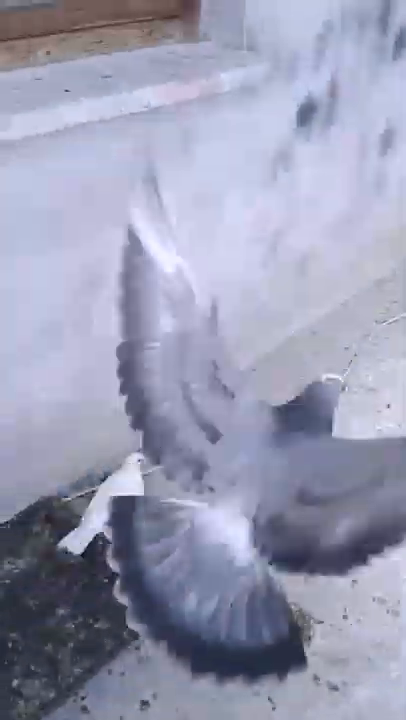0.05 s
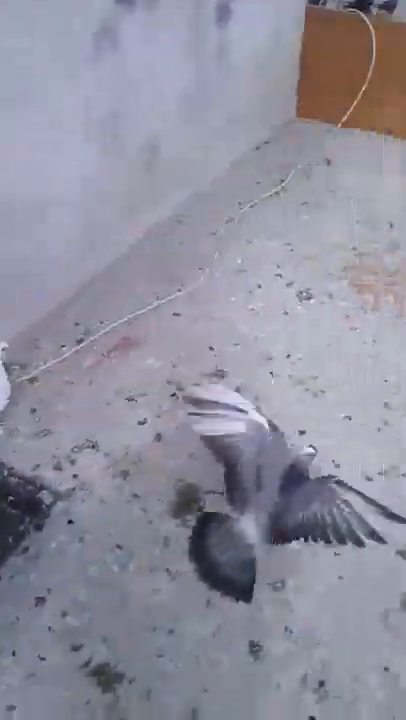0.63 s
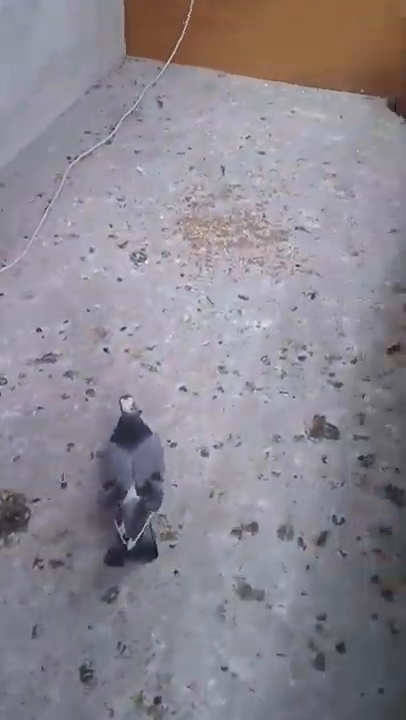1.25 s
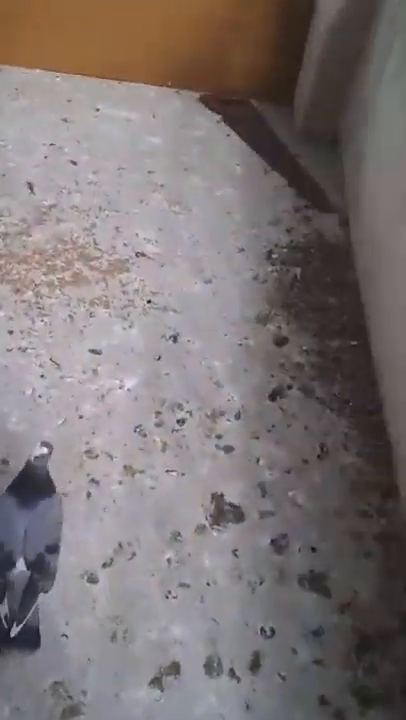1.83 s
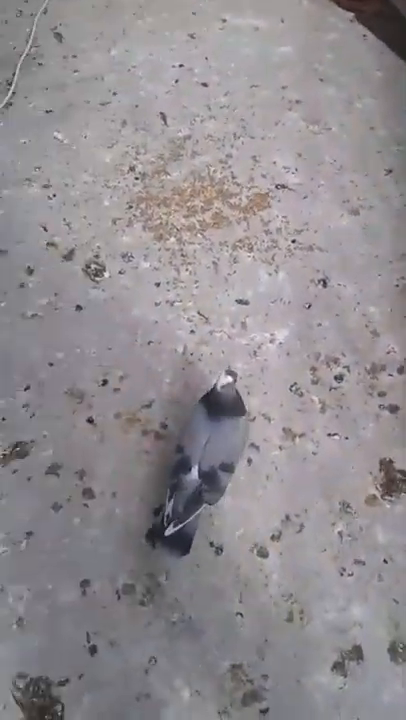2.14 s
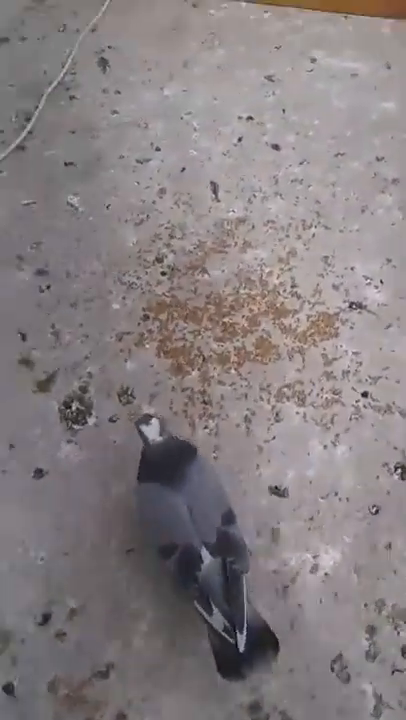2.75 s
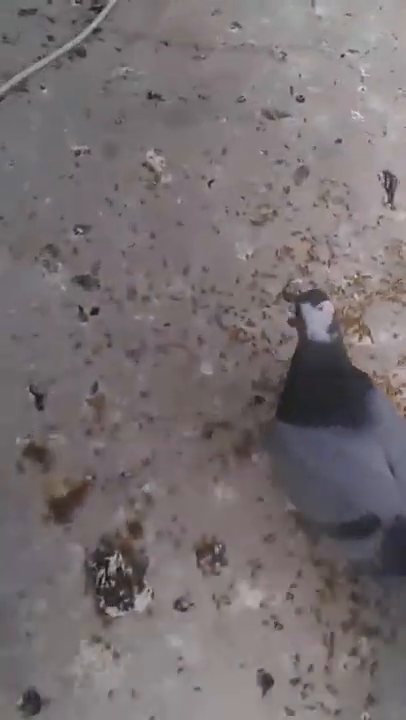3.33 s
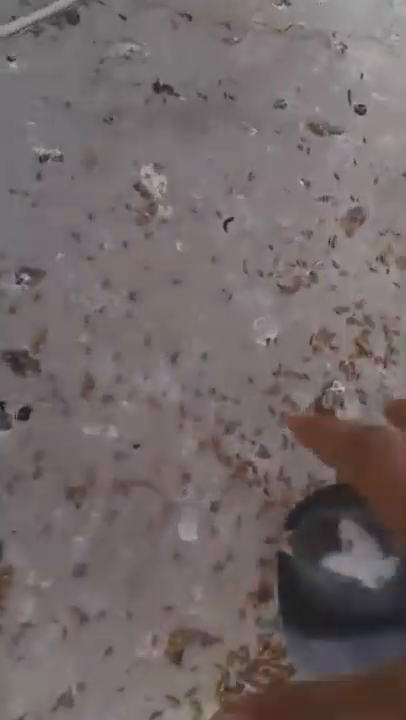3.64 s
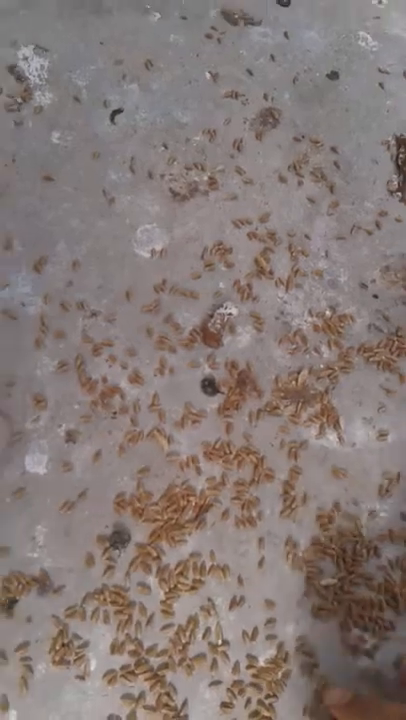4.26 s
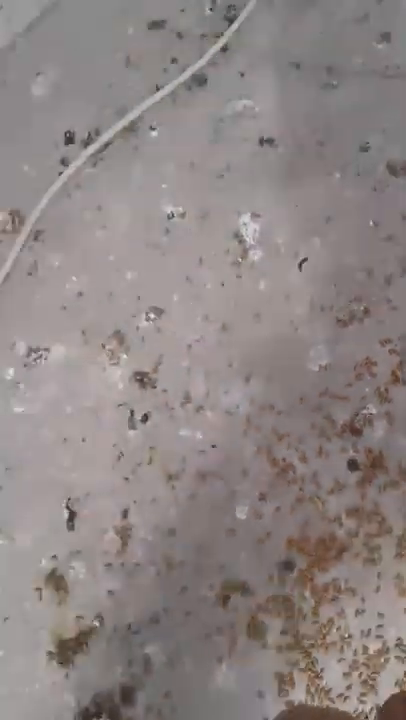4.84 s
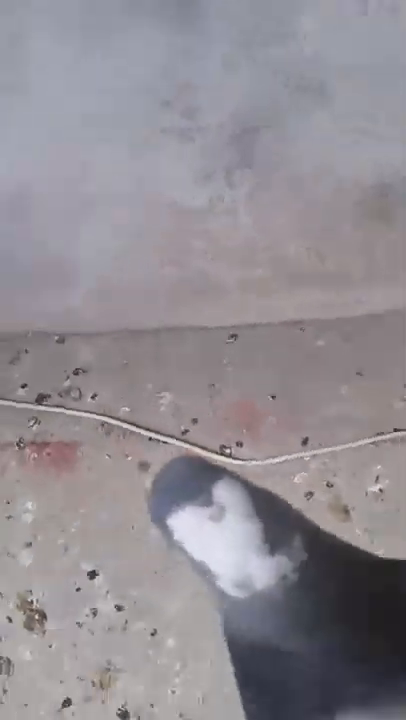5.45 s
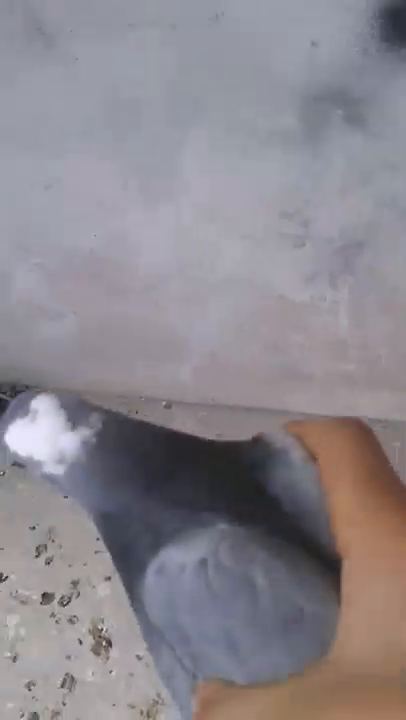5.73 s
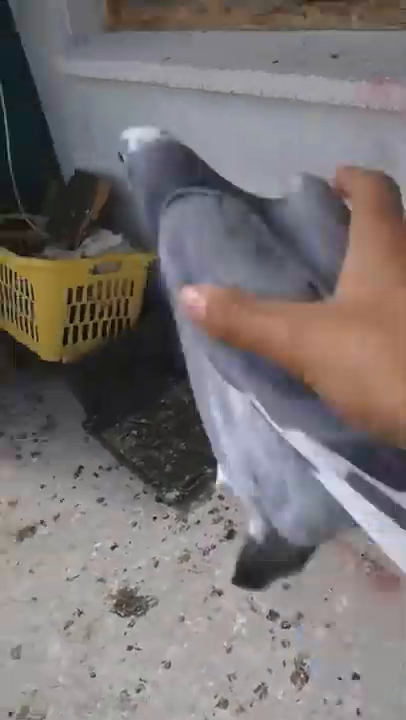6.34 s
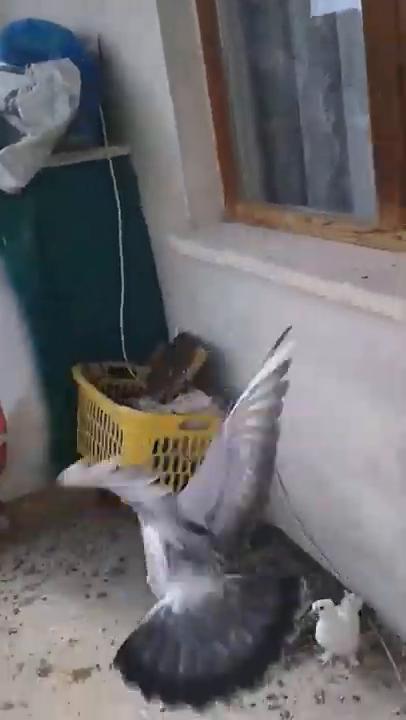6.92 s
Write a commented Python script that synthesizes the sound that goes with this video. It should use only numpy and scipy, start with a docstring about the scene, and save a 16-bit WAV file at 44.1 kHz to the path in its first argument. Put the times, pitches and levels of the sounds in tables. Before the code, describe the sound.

Close pigeon wing beats and rustling feathers on a concrete balcony, interrupted by a loud knock and finger rubbing on the microphone.

```python
"""Sharp wing claps and a rustle of feathers: a pigeon lands on a narrow concrete balcony, claws ticking.
A hand rubs and knocks on the phone, then grabs the bird, which beats its wings hard, struggles over
scattered seed and flies off with whistling feathers. Claps are slaps of air and quills, and bare walls
ring briefly after each; swishes and rubs are streams of tiny slips, bumps single swings of pressure.
Small birds chirp far away over an outdoor hush."""
import sys
import numpy as np
from scipy import signal
from scipy.fft import rfft, irfft, next_fast_len
from scipy.io import wavfile

SR = 44100
rng = np.random.default_rng(int(sys.argv[2]) if len(sys.argv) > 2 else 0)


def unload_audio(sound):
    """Save the sound as a 16-bit wav file, at the path given as the first command line argument."""
    columns = np.transpose(np.atleast_2d(sound))
    # keep every value between -1 and 1, then stretch to whole-number steps
    steps = np.round(np.clip(columns, -1, 1) * 32767)
    wavfile.write(sys.argv[1], SR, steps.astype(np.int16))


N = 312447
TIME = np.arange(N) / SR

# wing beats, about eight a second in the struggle:
# (time [s], level [dB], vane ring [Hz], slap t60 [s], body [dB])
WING_BEATS = [(0.0048, -21, 4420, 0.03, 2.5), (0.147, -29, 4960, 0.047, 2.5), (0.3213, -18, 1470, .022, 0),
              (0.324, -17, 4540, 0.031, -12.5), (2.8878, -17, 3060, 0.053, -10.5),
              (3.012, -27, 5670, 0.037, -4), (3.14, -20, 5360, 0.039, -1.5),
              (3.2669, -28.5, 5370, 0.071, -3.5), (3.397, -26, 5300, 0.079, -4.5),
              (3.521, -31.5, 2870, .17, -7), (3.767, -29.5, 5630, 0.027, -2), (3.892, -30, 5760, .09, -8),
              (4.013, -29, 5370, 0.073, -2.5), (4.15, -34.5, 4750, 0.097, -8), (4.283, -50, 2280, .06, 4),
              (4.406, -43, 3950, 0.2, -3), (4.52, -39.5, 2040, 0.1, 4.5), (4.877, -39.5, 2170, 0.057, -5),
              (5.001, -36.5, 2250, 0.11, 12.5), (5.143, -24.5, 2340, 0.076, 14),
              (5.837, -37, 3950, 0.15, -26), (6.9018, -27, 5500, 0.066, 1.5), (7.065, -34, 5770, 0.028, -1)]
# EQ of claps, ticks and seed clicks: (frequency [Hz], gain [dB])
IMPACT_EQ = [(60, -25.5), (250, -1), (700, 0), (2200, 1), (5500, -4), (8000, -12.5), (12000, -16.5),
             (17000, -24)]
# EQ of moving feathers: (frequency [Hz], gain [dB])
FEATHER_EQ = [(60, -33.5), (300, -1), (900, -2.5), (2100, 2), (3500, -5.5), (6000, -2.5), (8000, -15.5),
              (16000, -19)]


def undb(db):
    """Decibels to gain."""
    return 10 ** (np.asarray(db) / 20)


def unit(x):
    """Scale to rms 1."""
    return x / np.sqrt(np.mean(x ** 2) + 1e-20)


def with_energy(x, span_s):
    """Scale a hit to the energy of span_s seconds at rms 1."""
    return x * np.sqrt(span_s * SR / np.sum(x ** 2))


def add(track, s, x):
    """Mix x into the track from time s on."""
    start = int(round(s * SR))
    lo, hi = max(start, 0), min(start + len(x), N)
    if hi > lo:
        track[lo:hi] += x[lo - start:hi - start]


def eq(x, points, body_db=0, edge_db=0):
    """Causal filter through (Hz, dB) points, with shelves for the low body and the high edge."""
    size = next_fast_len(len(x) + 1024, True)
    size += size % 2
    log_f = np.log(np.maximum(np.arange(size // 2 + 1) * SR / size, 1))
    hz, db = np.transpose(points)
    curve_db = np.interp(log_f, np.log(hz), db)
    shelves_db = np.interp(log_f, np.log([600, 1700, 2900, 7000]), [body_db, 0, 0, edge_db])
    cepstrum = irfft(np.log(undb(curve_db + shelves_db)))
    cepstrum[1:size // 2] *= 2  # minimum phase: nothing rings ahead of an attack
    cepstrum[size // 2 + 1:] = 0
    return irfft(rfft(x, size) * np.exp(rfft(cepstrum)))[:len(x)]


def resonance(x, hz, width_hz):
    """Two-pole band-pass, gain 1 at the centre."""
    return signal.lfilter(*signal.iirpeak(hz, hz / width_hz, fs=SR), x)


def wander(rate, size):
    """Random drift that takes a new course `rate` times a second."""
    knots = rng.standard_normal(int(size * rate / SR) + 2)
    return 1.9 * np.interp(np.arange(size) * rate / SR, np.arange(len(knots)), knots)


def grit(size, rate, spread_db):
    """Dense tiny slips of uneven strength."""
    return unit(rng.standard_normal(size) * undb(spread_db * wander(rate, size)))


def strokes(rows, points, slip_rate, spread_db, fall_shape, ring, ring_width_hz):
    """Sliding contacts: a stream of slips swells to a crest and dies away, ringing what is rubbed."""
    out = np.zeros(N)
    for s, rise, fall, db, body_db, edge_db, ring_hz in rows:
        t = np.arange(-3 * rise, 4 * fall, 1 / SR)
        speed = np.exp(-np.where(t < 0, (t / rise) ** 2, np.abs(t / fall) ** fall_shape))
        slips = grit(len(t), slip_rate, spread_db)
        slips = slips + ring * resonance(slips, ring_hz, ring_width_hz)
        add(out, s + t[0], undb(db) * speed * unit(eq(slips, points, body_db, edge_db)))
    return out


def glides(rows, partials_db, waver, waver_rate, arch):
    """Short wavering tones that swell and fade while their pitch slides and arches."""
    out = np.zeros(N)
    for s, length, start_hz, end_hz, db in rows:
        size = int(length * SR)
        swell = np.hanning(size)
        bend = 1 + arch * (swell - .5) + waver * wander(waver_rate, size)
        phase = 2 * np.pi * np.cumsum(np.linspace(start_hz, end_hz, size) * bend) / SR
        tone = sum(undb(level) * np.sin(k * phase) for k, level in enumerate(partials_db, 1))
        add(out, s, undb(db) * unit(tone) * swell)
    return out


def hush():
    """A bed of far outdoor noise with an unsteady rumble under it."""
    # EQ of the outdoor air: (frequency [Hz], gain [dB])
    air_eq = [(15, -41), (25, -13.5), (81, -7), (279, -9.5), (445, -15.5), (496, -13), (708, -17),
              (812, -17.5), (1260, -19), (1570, -20), (2370, -23), (3670, -21), (4090, -18), (4440, -24.5),
              (17500, -36)]
    # fader ride, sinking for a moment after the knock: (time [s], level [dB])
    ride = [(0, -48.5), (.95, -57), (1.9, -49.5), (2.35, -61.5), (2.9, -58), (7.08, -54.5)]
    air = unit(eq(rng.standard_normal(N), air_eq))
    rumble = unit(resonance(rng.standard_normal(N), 120, 130) * undb(3.6 * wander(25, N)))
    return (air + undb(-9.5) * rumble) * undb(np.interp(TIME, *np.transpose(ride)))


def stirring():
    """How hard the bird moves, as a gain for its rustle and crackle."""
    # movement on landing: (time [s], level before trim [dB])
    landing = [(0.0, -40), (0.6, -49.5), (0.852, -60), (1.0, -68)]
    # movement in the struggle and escape: (time [s], level before trim [dB])
    struggle = [(2.5, -67.5), (2.63, -49.5), (2.79, -50), (3.07, -40), (3.39, -48), (3.58, -44), (4.5, -47),
                (4.87, -48.5), (5.29, -57.5), (5.75, -40.5), (5.88, -57), (6.35, -52.5), (6.65, -42.5),
                (7.08, -43)]
    return sum(undb(trim_db + np.interp(TIME, *np.transpose(ride), left=-np.inf, right=-np.inf))
               for ride, trim_db in ((landing, -5.5), (struggle, -4)))


def rustle(flutter_db=2.0):
    """Barbs scrape over each other as long as the bird moves."""
    # EQ of the plumage: (frequency [Hz], gain [dB])
    plumage_eq = [(59, -41), (100, -2), (144, -15), (213, -0.5), (314, 3.5), (390, 3), (813, -2.5),
                  (1340, -6.5), (2150, -3), (2610, -8), (3310, -4.5), (5570, -4.5), (7870, -20.5),
                  (16100, -20), (17500, -37.5)]
    scrape = grit(N, 700, spread_db=0.94) * undb(flutter_db * wander(30, N))
    return unit(eq(scrape, plumage_eq)) * stirring()


def crackle(flicks_per_s=70, spread_db=8, flick_t60=0.028):
    """Single stiff feathers flick past each other; the harder the bird moves, the louder."""
    flicks = (rng.random(N) < flicks_per_s / SR) * undb(rng.uniform(-spread_db, spread_db, N))
    envelope = signal.lfilter([1], [1, -undb(-60 / (flick_t60 * SR))], flicks)
    bursts = eq(envelope * rng.standard_normal(N), FEATHER_EQ, body_db=-6, edge_db=3)
    return undb(-8) * unit(bursts) * stirring()


def wing_claps(rush_db_per_s=2000, snap=2.8, usual_t60=0.045, tail_t60=0.18, tail_build_s=0.0029):
    """Air rushes out between the wings, the tips snap together, quills slap shut, the walls answer."""
    out, contact = np.zeros(N), SR // 40
    t = TIME[:SR // 3] - TIME[contact]
    after = np.maximum(t, 0)
    tail_envelope = undb(-60 * after / tail_t60) * (1 - np.exp(-after / tail_build_s))
    for s, db, vane_hz, t60, body_db in WING_BEATS:
        envelope_db = np.where(t < 0, -32 + rush_db_per_s * t, -60 * t / t60)
        slap = grit(len(t), 1491.5, spread_db=3.0) * undb(envelope_db)
        slap[contact] += snap
        # the bird moves, so every clap has its own diffuse tail, duller than the slap
        tail = eq(rng.standard_normal(len(t)) * tail_envelope, [(1, 0)], body_db=1, edge_db=-4)
        hit = unit(slap) + undb(-5) * unit(tail)
        # a wing that strikes the hand has more body and more quill ring
        quills = 0.64 * undb(0.9 * body_db) * resonance(hit, hz=2280, width_hz=160)
        # a drawn-out slap rings more narrowly and is duller
        stretch = t60 / usual_t60
        vane = resonance(hit, vane_hz, width_hz=1700 / stretch ** 0.81)
        clap = eq(hit + vane + quills, IMPACT_EQ, body_db, edge_db=6 - 1.5 * np.log2(stretch))
        add(out, s + t[0], undb(db) * with_energy(clap, span_s=0.019))
    return out


def swishes(rise_share=.42, edge_db_per_octave=10.5, neutral_hz=2940):
    """Feathers sweep through air or over the hand: tips ring high and hiss, the flat wing is dull."""
    # feather sweeps: (crest [s], length [s], level [dB], ring [Hz])
    sweeps = [(0.025, 0.024, -41, 3600), (0.5, 0.064, -43, 3430), (1.072, 0.021, -42.5, 1820),
              (1.124, 0.039, -49.5, 2070), (2.667, .09, -50.5, 3400), (2.761, 0.13, -50.5, 3000),
              (3.101, 0.027, -37, 2500), (3.132, 0.022, -30.5, 1900), (3.439, .036, -40.5, 2520),
              (3.567, .028, -37, 2980), (3.613, 0.035, -37.5, 1900), (3.659, 0.05, -32, 2420),
              (4.228, .018, -42, 1900), (4.658, 0.035, -33.5, 6000), (4.768, 0.047, -44.5, 6300),
              (4.832, 0.037, -41.5, 6330), (4.959, .05, -39, 3300), (5.127, .018, -33, 2700),
              (5.24, 0.051, -47, 4400), (5.554, 0.046, -40, 2360), (5.639, 0.014, -36, 1600),
              (5.665, 0.051, -23, 1770), (5.736, .08, -33.5, 2010), (6.067, 0.032, -48.5, 2230),
              (6.333, 0.052, -44.5, 6050), (6.475, .04, -35, 2570), (6.53, 0.072, -37.5, 2250),
              (6.593, 0.084, -39.5, 2140), (6.709, 0.076, -42, 3120), (6.831, 0.057, -43, 2900)]
    # after each beat the open wing swings back softly, pushing air that gives it body
    backswings = [(s + .055, .02, db - 24, 2900) for s, db, *_ in WING_BEATS]
    rows = []
    for moves, body_db in ((sweeps, -2), (backswings, 8.5)):
        for s, length, db, hz in moves:
            edge_db = edge_db_per_octave * np.log2(hz / neutral_hz)
            rows.append((s, rise_share * length, (1 - rise_share) * length, db, body_db, edge_db, hz))
    return strokes(rows, FEATHER_EQ, slip_rate=980, spread_db=2.5, fall_shape=1.3,
                   ring=0.58, ring_width_hz=390)


def fumbles(spread_db=6.0, spread_octaves=0.27):
    """A shifting grip makes small random bumps: rows of (time [s], level [dB], pitch [Hz])."""
    # spells of shifting grip: (start [s], end [s], bumps [1/s], level [dB], pitch [Hz])
    spells = [(0.03, 0.117, 70, -38, 130), (0.55, 1.052, 40, -45, 180), (1.322, 1.439, 75, -42.5, 150),
              (3.33, 3.562, 65, -41, 105), (5.179, 5.332, 50, -46, 138), (6.6, 6.658, 35, -44, 85)]
    rows = []
    for start, end, rate, db, hz in spells:
        for when, strength, pitch in rng.uniform(-0.92, 1, (round((end - start) * rate), 3)):
            s = (start + end + when * (end - start)) / 2
            rows.append((s, db + spread_db * strength, hz * 2 ** (spread_octaves * pitch)))
    return rows


def thumps(cycles_in=0.44, cycles_out=0.57, sag_hz=42, sag_db=-35):
    """Each bump on the phone is a single low swing of pressure followed by a slower sag."""
    # bumps of the hand and puffs of wing air: (time [s], level [dB], pitch [Hz])
    bumps = [(0.0395, -20, 256), (0.0662, -29.5, 171), (0.1373, -32, 354), (0.4814, -32, 315),
             (0.701, -30, 208), (1.0598, -27, 239), (1.711, 8, 338), (1.7547, -5.5, 299),
             (3.4453, -31, 286), (3.5586, -24.5, 146), (4.7794, -31.5, 530), (5.0864, -22, 373),
             (5.0925, -17, 267), (5.155, -21, 366), (5.5397, -28, 340), (6.7489, -30.5, 305)]
    out, t = np.zeros(N), TIME[:4096] - TIME[2048]
    cycles = np.where(t < 0, cycles_in, cycles_out)
    for s, db, hz in bumps + fumbles():
        swing, sag = (np.sin(2 * np.pi * f * t) * np.exp(-(t * f / cycles) ** 2) for f in (hz, sag_hz))
        add(out, s + t[0], undb(db) * (swing + undb(sag_db) * sag * (t > 0)))
    return out


def far_birds():
    """Small distant birds chirp in thin, wavering tones."""
    # chirps: (time [s], length [s], start pitch [Hz], end pitch [Hz], level [dB])
    chirps = [(.60, 0.096, 3580, 3630, -52.5), (.87, 0.044, 3630, 3920, -53), (1.13, 0.11, 5300, 5000, -57),
              (2.64, .06, 5580, 5220, -49), (2.665, 0.019, 3410, 3300, -42), (2.72, 0.13, 5400, 5270, -57),
              (4.66, 0.093, 5400, 5110, -48.5), (4.78, 0.1, 5180, 5320, -47)]
    return glides(chirps, partials_db=[0], waver=.02, waver_rate=900, arch=.02)


def ticks(t60=0.0051, crunch=0.52):
    """Tiny hard contacts that hardly ring: a spike and a short crunch."""
    # taps of claws, seeds and fingernails: (time [s], level [dB], edge [dB])
    taps = [(0.7636, -49, 4), (0.8141, -45, -3), (1.2418, -33.5, 5), (1.3552, -30.5, 18),
            (1.6139, -28, 16.5), (1.711, -9.5, -2), (3.3685, -40, 2), (3.4484, -33.5, -12),
            (3.6178, -35, 5), (3.638, -29, 1), (3.674, -28.5, -4), (3.7187, -34.5, -2), (5.379, -44.5, -1),
            (5.75, -34.5, 5), (6.475, -36.5, 9)]
    out, t = np.zeros(N), TIME[:1024]
    for s, db, edge_db in taps:
        tick = crunch * rng.standard_normal(len(t)) * undb(-60 * t / t60)
        tick[0] += 1
        tick = eq(tick, IMPACT_EQ, body_db=-10, edge_db=edge_db)
        add(out, s, undb(db) * with_energy(tick, span_s=0.0025))
    return out


def finger_rubs(firm_touch_db=-22):
    """Skin drags over the phone's case: dull when pressed hard, hissing when it only skids."""
    # finger slides: (crest [s], rise [s], fall [s], level [dB], body [dB], case ring [Hz])
    slides = [(1.32, 0.042, .055, -42, -5.5, 1700), (1.605, .013, 0.03, -47, -17.5, 500),
              (1.722, 0.0066, 0.0091, -18, 7, 400), (1.752, .0065, 0.0088, -9.5, 2.5, 420),
              (1.765, .005, 0.03, -15.5, 0.5, 598), (1.817, .006, 0.024, -18.5, 2, 480),
              (1.85, .016, 0.015, -27, 2.5, 500), (1.906, .011, 0.014, -17.5, 2, 1700),
              (1.924, .008, .012, -10, -2.5, 1500), (2.014, .015, 0.039, -28, -9, 600),
              (2.122, 0.05, 0.037, -41.5, -12, 1200)]
    # EQ of the case: (frequency [Hz], gain [dB])
    case_eq = [(40, -25.5), (90, -9.5), (160, 0.5), (400, 1.5), (1800, -5.5), (3500, -10), (6000, -23.5),
               (10000, -31), (17000, -35)]
    rows = []
    for s, rise, fall, db, body_db, ring_hz in slides:
        skid_edge_db = max(firm_touch_db - db, 0) - 0.5
        rows.append((s, rise, fall, db, body_db, skid_edge_db, ring_hz))
    return strokes(rows, case_eq, slip_rate=1200, spread_db=1.5, fall_shape=1.46,
                   ring=.4, ring_width_hz=400)


def seeds(start_s=3.0, busiest_s=3.65, end_s=4.7, peak_clicks_per_s=100, db=-47, spread_db=1.5):
    """Feet and hand nudge loose grains on the concrete; each click rings briefly at its own pitch."""
    out, spike = np.zeros(N), signal.unit_impulse(1024)
    rate = np.interp(TIME, [start_s, busiest_s, end_s], [0, peak_clicks_per_s, 0])
    starts = TIME[rng.random(N) < rate / SR]
    for s, (strength, pitch) in zip(starts, rng.standard_normal((len(starts), 2))):
        ring_hz = np.clip(3000 * np.exp(.5 * pitch), 1000, 9000)
        click = eq(spike + 4 * resonance(spike, ring_hz, width_hz=280), IMPACT_EQ, body_db=-4)
        attack_rms = np.sqrt(np.mean(click[:SR // 400] ** 2))
        add(out, s, undb(db + spread_db * min(strength, 2)) * click / attack_rms)
    return out


def thin_hiss(hz=2450, width_hz=500, waver_db=.8):
    """A faint, narrow, wavering band of noise comes and goes."""
    # swells of hiss: (time [s], length [s], level [dB])
    swells = [(4.604, 0.22, -53.5), (5.88, 0.52, -58.5), (6.45, 0.27, -51)]
    envelope = np.zeros(N)
    for s, length, db in swells:
        add(envelope, s, undb(db) * np.sqrt(np.hanning(int(length * SR))))
    band = resonance(resonance(rng.standard_normal(N), hz, width_hz), hz, width_hz)
    return unit(band) * undb(waver_db * wander(18, N)) * envelope


def wing_whistle():
    """Flight feathers whistle in the air as the pigeon takes off."""
    # whistling strokes: (time [s], length [s], start pitch [Hz], end pitch [Hz], level [dB])
    whistles = [(6.795, 0.057, 750, 696, -41.5), (6.94, 0.078, 621, 658, -38.5)]
    # harmonics of the whistle, from the fundamental up: (level [dB])
    partials_db = [0, -2, -2, -15, -13]
    return glides(whistles, partials_db, waver=.022, waver_rate=300, arch=.06)


def balcony(x, wet_db=-8, t60_low=0.46, t60_mid=0.23, t60_high=0.07, build_s=0.0014):
    """Close bare walls add a short dense tail whose treble dies first."""
    t = TIME[:SR // 2]
    noise = rng.standard_normal(len(t))
    low, low_and_mid = (signal.sosfilt(signal.butter(2, hz, fs=SR, output="sos"), noise)
                        for hz in (900, 7000))
    bands = (undb(-2) * low, t60_low), (low_and_mid - low, t60_mid), (noise - low_and_mid, t60_high)
    tail = sum(band * undb(-60 * t / t60) for band, t60 in bands) * (1 - np.exp(-t / build_s))
    tail /= np.sqrt(np.sum(tail ** 2))
    return x + undb(wet_db) * signal.fftconvolve(x, tail)[:N]


def scene():
    """Swishes, seeds, whistle and chirps ring in the balcony; claps bring their tails; the rest is dry."""
    whistle = undb(-0.5) * wing_whistle()
    birds = far_birds()
    reverberant = balcony(swishes() + seeds() + whistle + birds) + wing_claps()
    close = undb(2.5) * finger_rubs() + undb(1) * ticks() + undb(-0.5) * thumps()
    return (reverberant + close + rustle() + crackle() + thin_hiss() + hush())[None]


def record(dry, top_hz=18000):
    """The phone clips the hardest knocks and cuts the top."""
    low_pass = signal.ellip(8, .2, 70, top_hz, fs=SR, output="sos")
    return signal.sosfilt(low_pass, np.clip(dry, -1, 1))


dry = scene()
out = record(dry)
unload_audio(out)
```